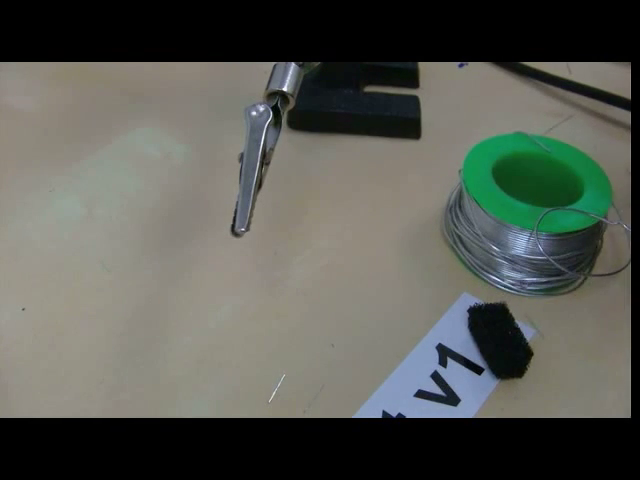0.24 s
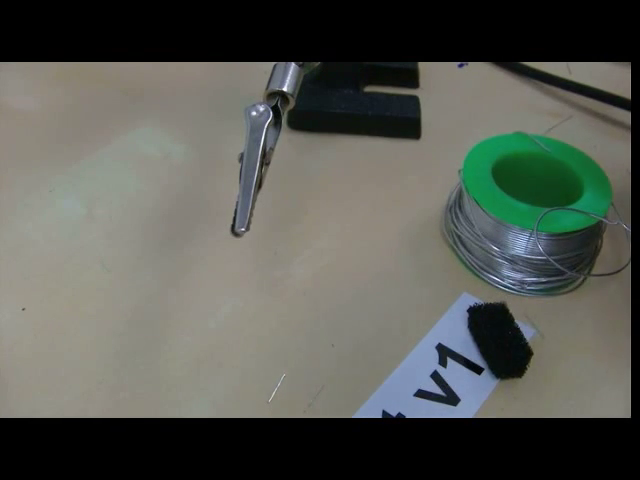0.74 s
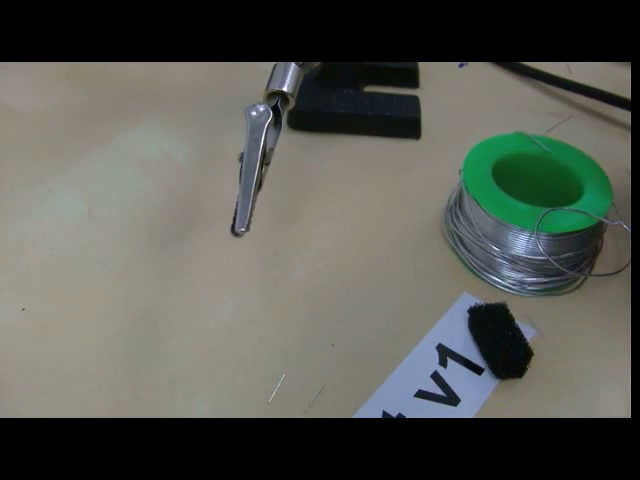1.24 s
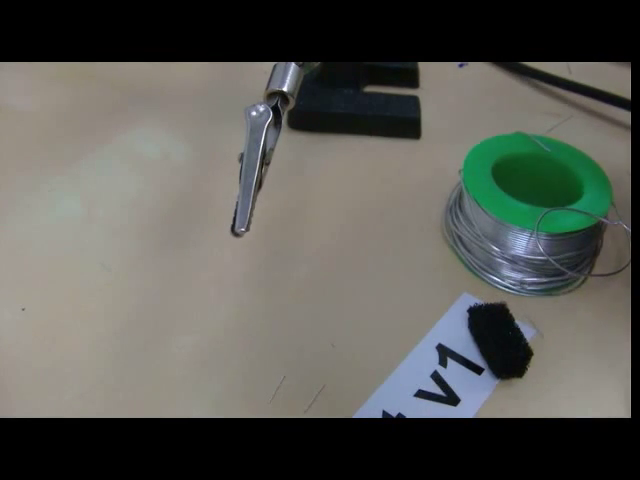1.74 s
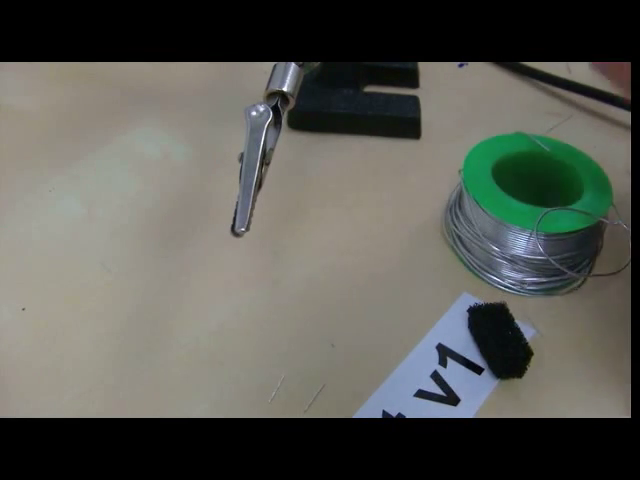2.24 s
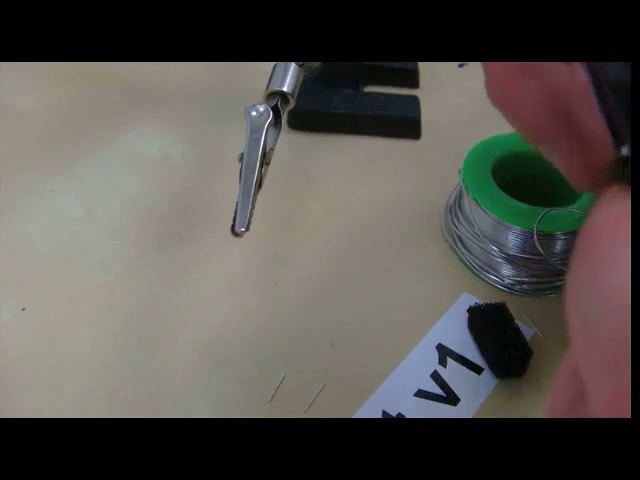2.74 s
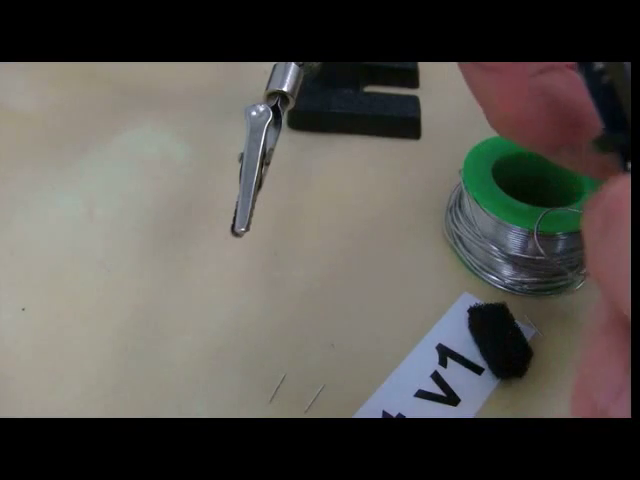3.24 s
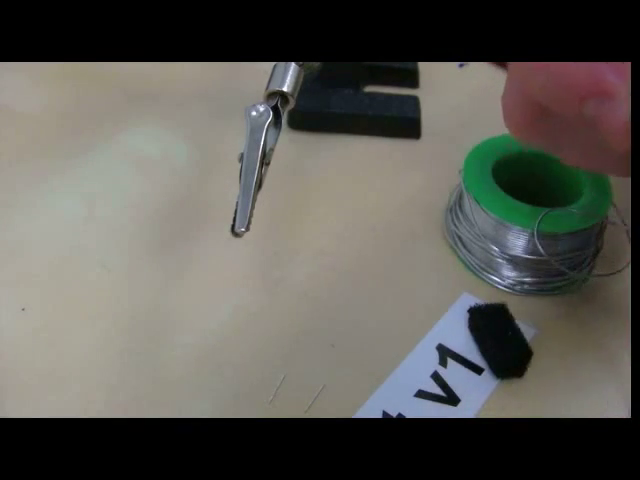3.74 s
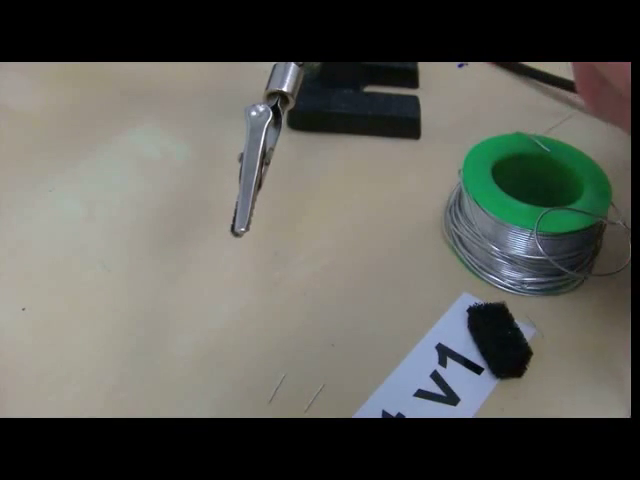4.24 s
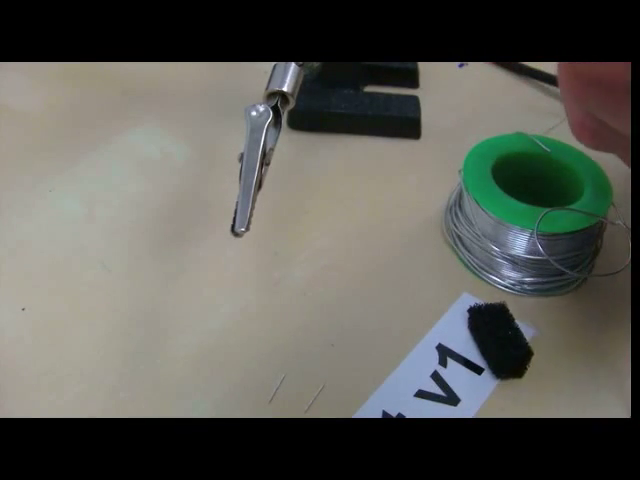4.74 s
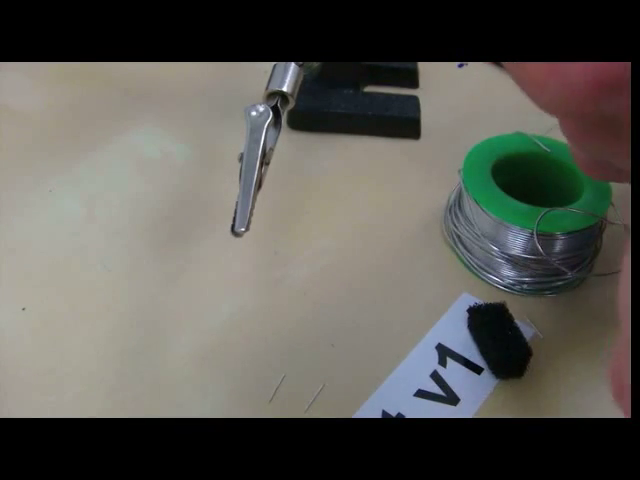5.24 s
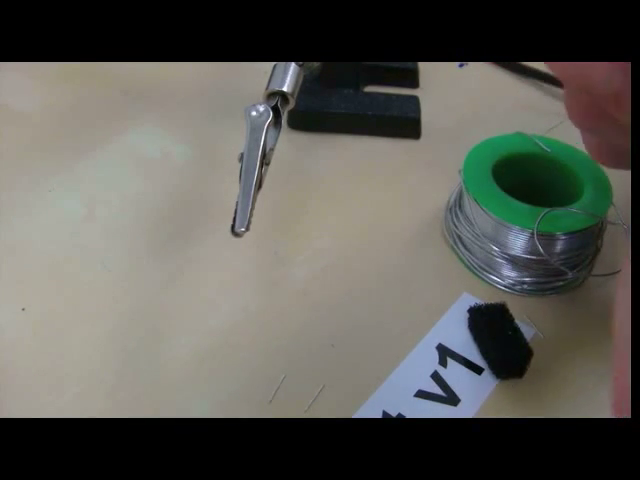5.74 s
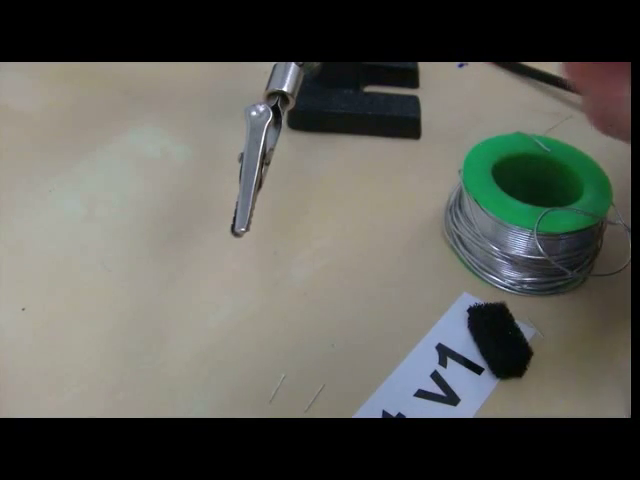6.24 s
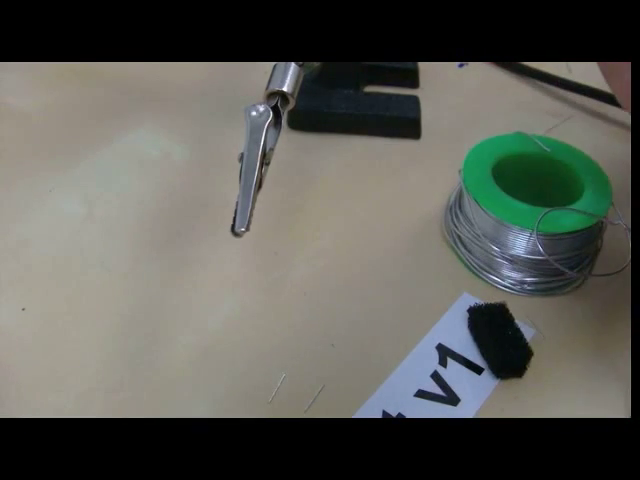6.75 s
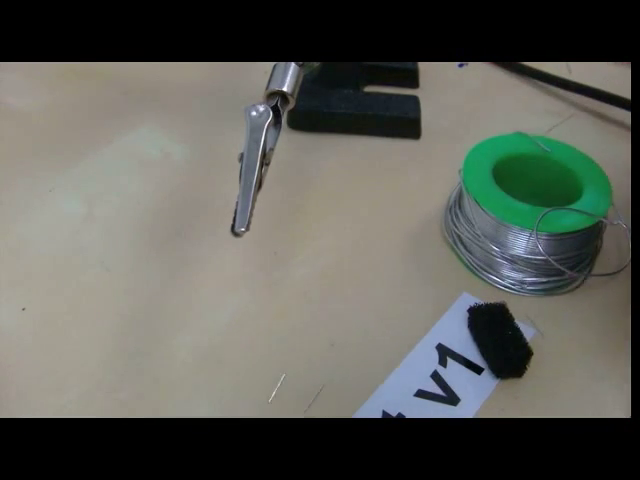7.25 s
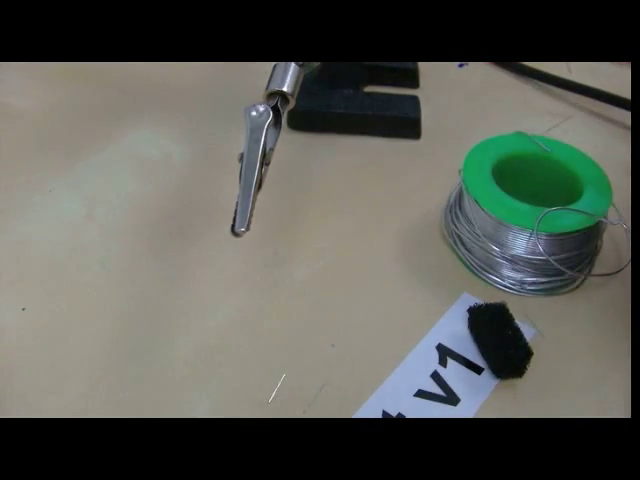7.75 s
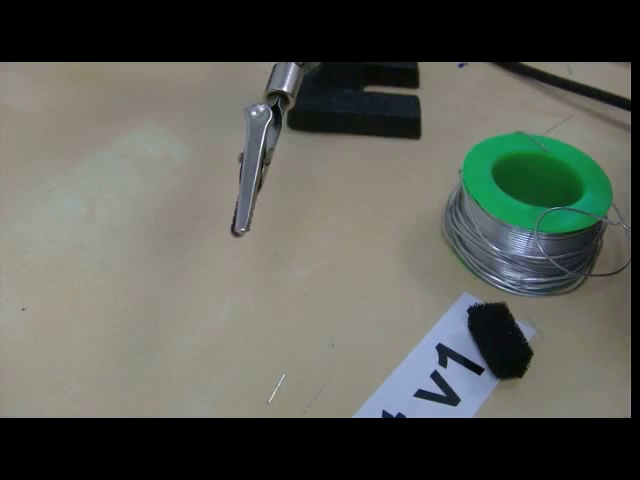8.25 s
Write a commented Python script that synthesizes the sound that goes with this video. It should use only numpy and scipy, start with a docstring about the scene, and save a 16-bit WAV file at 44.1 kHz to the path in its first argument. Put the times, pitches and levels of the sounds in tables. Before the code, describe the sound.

After a few quiet seconds of fan air, crisp plastic zip clicks come in short bursts, ending with one hard snap that rings briefly.

```python
"""First a fan rushes in a small room, with faint, soft swells of noise and light finger ticks: filtered noise.
Close by, over a workbench, a nylon cable tie is then drawn through its ratchet head in short spurts.
Each tooth snaps the pawl, a brief noise burst coloured by the tie's resonances; every new grip rings differently.
Bench scatter, a wall echo and a short room tail answer each snap; the last tooth leaves the strap ringing.
A faint low room resonance, faint wavering fan tones and a steady mains hum are sines."""
import sys
import numpy as np
from scipy import signal
from scipy.fft import rfft, irfft
from scipy.io import wavfile

SR = 44100
rng = np.random.default_rng(int(sys.argv[2]) if len(sys.argv) > 2 else 0)


def dump(signal):
    """Clip the signal to [-1, 1] and save it as 16-bit WAV at the path in sys.argv[1]."""
    limited = np.clip(np.atleast_2d(signal).T, -1, 1)
    pcm = np.round(limited * 32767).astype(np.int16)
    wavfile.write(sys.argv[1], SR, pcm)


N = 373968

# Teeth passing the pawl. Each row: start in seconds, relative level in dB, brightness in dB per octave,
# low knock in dB, ping in dB, ping in Hz, antiresonance in Hz, delay until the pawl lands in seconds,
# strength of the landing as a signed share of the release.
TEETH = [(2.8137, -11.0, 3.5, 10.5, 7, 11780, 7900, 0.000233, 0.29),
         (2.932, -17.5, -0.5, -4.5, 9, 10930, 7760, 0.00035, 0.46),
         (2.983, -17.5, -3, 1.5, 5, 4670, 10070, 0.000652, -0.33),
         (3.0274, -10.5, 1.5, 2, 3, 6500, 9200, 0.000538, -0.12),
         (3.066, -14, -2.0, -6, 10, 7210, 7370, 0.000291, 0.23),
         (3.2163, -4.0, -0.5, -2.0, 10, 6850, 8010, 0.000229, 0.33),
         (3.2199, -4, 1, 3, 12.5, 3530, 11900, 0.00045, 0.33),
         (3.2464, -2.5, 1, 11, 6.5, 5160, 12930, 0.00045, 0.23),
         (3.3458, -1.5, 0.5, 8, 2, 5970, 9560, 0.000868, 0.34),
         (3.369, -1.5, 0, 5, 2.5, 6030, 7930, 0.00032, -0.34),
         (3.387, -2.0, -0.5, 1, 10.0, 11830, 8400, 0.000514, -0.29),
         (3.4045, -1.5, 0.0, -1.5, 3.5, 10350, 8170, 0.000251, 0.27),
         (3.407, 2, -4.5, -9, 4.5, 3330, 7750, 0.00055, -0.24),
         (3.4289, -2.5, 1, 4.5, 10.5, 6680, 7910, 0.000355, -0.23),
         (3.4498, -3.5, -1, 5, 5.5, 10250, 2480, 0.00071, 0.22),
         (3.499, 1, -1, 3, 5.0, 4590, 7400, 0.00089, -0.22),
         (3.5187, 1.5, -2, -3, -8.5, 7490, 7540, 0.00093, 0.057),
         (3.5374, -1.5, -2, -0.5, 2.5, 6850, 7990, 0.00048, -0.16),
         (3.5646, -1.0, -3.5, -4, 6.0, 13560, 7950, 0.00028, 0.19),
         (4.6404, -7.0, -2, 1.0, 10.0, 13700, 14440, 0.0006, 0.24),
         (4.685, -4.5, -3.0, -5.5, 5.5, 13880, 7690, 0.000845, 0.18),
         (4.7132, -4.0, -1, -3.5, 1, 5620, 7820, 0.000846, 0.18),
         (4.751, -4.5, 2.5, 1.0, 8, 3300, 8300, 0.000667, -0.18),
         (4.7778, -2.5, 1, 0, -1.0, 13250, 8430, 0.000622, 0.13),
         (4.8178, -2.5, -2, -3.0, 5.0, 12330, 8100, 0.000616, 0.27),
         (4.8584, -2.5, 0.5, 1, 6.5, 2870, 7780, 0.00064, 0.39),
         (5.3692, -5, 0.5, 0, 3.5, 14280, 8180, 0.000744, -0.16),
         (5.384, -4.5, 1, 3, 5, 10110, 8440, 0.00077, -0.17),
         (5.4056, -1.5, 1.0, 5, 7.5, 4590, 14310, 0.00088, 0.24),
         (5.5066, 5.5, -1.5, -9.5, -10, 7200, 8160, 0.00072, -0.05),
         (5.5925, 4, -2.5, -5.0, 7.5, 13800, 7860, 0.00081, -0.1),
         (5.7854, -1.0, 1.5, 1, -2.0, 8890, 8640, 0.00041, -0.2),
         (6.4715, -4, -2, -7.5, 6, 6900, 7660, 0.000584, -0.29),
         (6.5183, -4.5, -0.5, 0.5, 5.0, 7160, 7680, 0.000811, -0.15),
         (6.6504, -5, 1.5, 5.5, 7, 7360, 7570, 0.00063, -0.21),
         (7.756, -7.5, 0.0, 5, 5, 11090, 7980, 0.000678, -0.39),
         (7.9043, -6.5, 0.0, 5, 5.0, 11540, 8070, 0.000781, 0.16),
         (7.9162, 8, -1, -3, 9, 7850, 8010, 0.00027, -0.29)]
# Ring of head and strap, one table per grip. Each row: centre in Hz, half width in Hz, level in dB.
THREADING = [(2070, 470, -5.5), (5500, 2100, -4.5), (6840, 430, -3.5), (7930, 250, -1), (9070, 420, -2.0),
             (11180, 1620, -22), (12160, 250, -16.5), (14300, 740, -18)]
FIRST_PULL = [(1890, 600, -15.5), (5130, 770, -5), (5900, 190, 2), (8140, 250, -8), (8680, 1310, -2),
              (10500, 700, -7), (12040, 260, -11.0), (14800, 1600, -6.5)]
SECOND_PULL = [(2530, 2010, -23.5), (4500, 340, -7.5), (6260, 490, -2.5), (7770, 580, 1.5), (8890, 250, -6),
               (10260, 860, -2), (12490, 300, -6.5), (14820, 1490, -11)]
SLOW_PULL = [(1840, 1500, -17.5), (4770, 1240, -12), (5690, 270, -6), (7230, 1000, -6.5), (8200, 950, -8),
             (10000, 770, -1), (12220, 670, -13.5), (13870, 1250, -11.5)]
FIRM_PULL = [(1000, 660, -9.5), (3860, 860, -11.5), (6240, 390, 0.0), (7520, 880, -0.5), (8960, 360, -8.5),
             (10360, 980, -5), (12480, 1030, -3.5), (14840, 310, -3.5)]
HARD_PULL = [(2560, 1900, -17.5), (4600, 290, -8.5), (6600, 520, -4), (7500, 400, -1), (7900, 280, 4),
             (10310, 300, -19), (12330, 830, -3), (14800, 300, -8)]
LAST_PULL = [(1620, 1040, -11.5), (3150, 220, -10), (6020, 280, 0), (6780, 410, 0.5), (7870, 330, 5),
             (10100, 310, -3), (12500, 720, -3.5), (14280, 1070, -6.5)]
TIGHTENING = [(1170, 740, -13.5), (3170, 1090, -14.5), (6320, 590, -4.5), (7730, 380, 7), (9310, 220, -8),
              (10390, 210, -3), (11940, 810, -8.0), (13910, 1570, -8.5)]
TAUT = [(2750, 980, -14.5), (4370, 200, -22), (6000, 540, -6), (8030, 460, 2.5), (9250, 620, -2.5),
        (11100, 320, -3), (11840, 1000, -16.0), (14320, 1020, -5)]
# How the tie is held. Each row: ring table, length of the slip in seconds, mean pawl chatter in dB, room in dB.
GRIPS = [(THREADING, .001, -10, -15), (FIRST_PULL, .0012, -8, -17.5), (SECOND_PULL, 0.00092, -13, -19),
         (SLOW_PULL, .00085, -12, -18), (FIRM_PULL, 0.0007, -15, -19), (HARD_PULL, 0.000925, -11, -18),
         (LAST_PULL, 0.00096, -13, -21), (TIGHTENING, 0.0009, -9.5, -16), (TAUT, 0.00122, -11, -14)]
# Moments at which the next grip takes over. Each entry: time in seconds.
REGRIP_S = [3.15, 3.475, 4.2, 5.1, 5.45, 5.7, 6.1, 7.83]
# Clusters of modes in the taut strap. Each row: centre in Hz, half width in Hz, relative level in dB,
# t60 in seconds.
STRAP_MODES = [(2500, 170, -6, 0.04), (4100, 390, -8, 0.074), (6340, 420, -14, 0.38),
               (8350, 950, -7.5, 0.26), (9250, 450, -9, .12)]
# The clearer ticks of fingers and strap tip. Each row: start in seconds, relative level in dB, centre in Hz,
# half width in Hz, dull body in dB.
TICKS = [(1.4086, -20.5, 6450, 300, -8.5), (1.605, -34.5, 9500, 3800, -2), (1.685, -34, 5000, 5000, -8),
         (1.7601, -24.5, 6400, 1300, -10), (2.403, -32.5, 6440, 3400, -14), (2.432, -31.5, 5600, 3000, -12),
         (2.878, -37.5, 7860, 3400, 4), (3.743, -30, 5200, 2800, -8), (3.816, -24, 3680, 1100, -1.5),
         (4.301, -40, 8000, 3400, -8), (4.4432, -32, 5600, 2200, -14), (5.878, -38, 7500, 3000, -12)]
# Soft noise swells, one of them a low swell of the room air. Each row: middle in seconds,
# half length in seconds, rms level at the middle in dB, centre in Hz, half width in Hz.
SWELLS = [(0.538, .05, -68, 3000, 1800), (1.65, 0.48, -62.5, 880, 200), (2.118, 0.067, -66, 1900, 1700),
          (2.917, .09, -68.5, 2600, 2000), (3.427, .06, -60, 1900, 700), (5.22, 0.11, -68, 2300, 2200)]
# A faint low resonance of the room. Each row: frequency in Hz, level in dB, t60 in seconds.
LOW_ROOM_MODES = [(709, -45, 0.11), (1060, -52, 0.12)]
# Decay of the small room. Each row: frequency in Hz, t60 in seconds.
ROOM_DECAY = [(500, 0.27), (3000, 0.14), (8000, 0.11), (15000, 0.11)]
# Spectrum of fan and room air. Each row: frequency in Hz, relative density in dB per Hz.
AIR_SPECTRUM = [(20, -30), (60, -17.5), (100, -20.5), (200, -17), (330, -8), (700, -0.5), (1100, -3),
                (1450, -9), (2600, -16), (4000, -20), (6500, -24.5), (10000, -27.5), (15000, -29.5)]
# Room resonances that the fan excites. Each row: centre in Hz, half width in Hz, lift in dB.
AIR_MODES = [(171.6, 15, 11.5), (228.7, 6.8, 7), (278.5, 7.9, 9), (360.5, 22.7, 8), (473, 8.3, 7),
             (577.8, 8.7, 8.5), (709.5, 22, 4.5), (813, 15, -1), (857, 12.3, 0), (1000.5, 3.9, 10),
             (1024, 4.7, 6), (3190, 25, 6.5), (3404, 22, 8.5), (5300, 76, 1)]
# Tones of the fan. Each row: frequency in Hz, rms level in dB before it wavers.
FAN_TONES = [(398.4, -74.5), (581.4, -81), (909.8, -74.5), (1141, -72.5)]
# Overall colour, with a narrow notch and a dulled top. Each row: frequency in Hz, gain in dB.
OVERALL_COLOUR = [(7700, 0), (7940, -9), (8080, 0.5), (15200, 3.5), (15450, -13)]

# Time (s) and frequency (Hz) axes of one snap
SIZE = 2048
T, HZ = np.arange(SIZE) / SR, np.fft.rfftfreq(SIZE, 1 / SR)


def amp(db):
    """Decibels to gain."""
    return 10 ** (np.asarray(db) / 20)


def unit(x):
    """Scales to energy 1."""
    return x / np.sqrt(np.sum(x ** 2) + 1e-20)


def read(points, hz):
    """Joins (Hz, value) points on a log-frequency axis."""
    f, value = np.transpose(points)
    return np.interp(np.log(hz + 1), np.log(f + 1), value)


def add(mix, s, sound):
    """Mixes a sound in at s seconds."""
    part = mix[round(s * SR):][:len(sound)]
    part += sound[:len(part)]


def bell(hz, centre, width):
    """Response of one resonance, 1 at its centre and 1/2 at its half width."""
    return 1 / (1 + ((hz - centre) / width) ** 2)


def causal(gain):
    """Spectrum of the quickest causal (minimum-phase) filter with this gain."""
    cepstrum = irfft(np.log(np.maximum(gain, 1e-5)))
    half = len(cepstrum) // 2
    cepstrum[1:half] *= 2
    cepstrum[half + 1:] = 0
    return np.exp(rfft(cepstrum))


def drift(rate_hz):
    """Slow random wander of rms 1."""
    hz = np.fft.rfftfreq(N, 1 / SR)
    return np.sqrt(N) * unit(irfft(rfft(rng.standard_normal(N)) * bell(hz, 0, rate_hz) ** 2, N))


def ratchet(level_db=-0.34, low_hz=600, body_db=-27, node_depth=0.75, node_width_hz=380,
            knock_hz=2200, knock_width_hz=800, ping_width_hz=600, chatter_spread_db=5.5):
    """The pawl leaves one tooth and lands on the next, ringing the tie; the grip sets ring, chatter and room."""
    out = np.zeros(N)
    radiated = HZ ** 2 / (HZ ** 2 + low_hz ** 2)  # a small part sends out little bass
    octaves = np.log2((HZ + 1) / 8000)
    for s, db, bright_db, knock_db, ping_db, ping_hz, node_hz, landing_s, landing in TEETH:
        ring, slip_s, chatter_db, room_db = GRIPS[np.searchsorted(REGRIP_S, s)]
        ring_power = sum((amp(d) * bell(HZ, f, w)) ** 2 for f, w, d in ring)
        power = amp(body_db) ** 2 + ring_power
        notch = 1 - node_depth * bell(HZ, node_hz, node_width_hz)
        knock = knock_db * bell(HZ, knock_hz, knock_width_hz)
        ping = ping_db * bell(HZ, ping_hz, ping_width_hz)
        strike_db = bright_db * octaves + knock + ping
        gain = np.sqrt(power) * notch * radiated * amp(strike_db)
        # release and landing are two copies of one burst, so they comb the spectrum
        landed = landing * np.exp(-2j * np.pi * HZ * landing_s)
        two_contacts = (1 + landed) / np.hypot(1, landing)
        # no two teeth slip alike
        tooth_chatter_db = chatter_db + chatter_spread_db * rng.standard_normal()
        burst = two_contacts * snap(tooth_chatter_db, slip_s)
        add(out, s, amp(db + level_db) * surroundings(burst, gain, room_db))
    return out


def snap(chatter_db, slip_s=0.00082, chatter_s=0.002, evenness=0.94):
    """The pawl slips off a tooth in a broadband burst, then chatters briefly against the strap."""
    slip, chatter = rng.standard_normal((2, SIZE))
    window = np.sin(np.pi * np.minimum(T / slip_s, 1)) ** 2
    for _ in range(3):  # so short a slip pushes all frequencies about equally
        z = rfft(slip * window)
        slip = irfft(z / (abs(z) + 1e-9) ** evenness)
    chatter *= (T > slip_s) * np.exp(-T / chatter_s)
    slip = unit(slip * np.sqrt(window))
    return rfft(unit(slip + amp(chatter_db) * unit(chatter)))


def taut_ring(level_db=-13):
    """The last and hardest tooth leaves clusters of close modes ringing in the tight strap."""
    out, t, hz = np.zeros(N), np.arange(SR // 2) / SR, np.fft.rfftfreq(SR // 2, 1 / SR)
    last_tooth_s = TEETH[-1][0]
    for centre_hz, width_hz, db, t60 in STRAP_MODES:
        random_phase = np.exp(2j * np.pi * rng.random(len(hz)))
        cluster = irfft(random_phase * bell(hz, centre_hz, width_hz))
        add(out, last_tooth_s, amp(level_db + db) * unit(cluster * amp(-60 * t / t60)))
    return out


def handling(level_db=3.5, chatter_db=-3, room_db=-10, body_hz=4000, body_width_hz=5000):
    """Fingers feed and regrip the strap: soft ticks, each a snap through one resonance and a dull body."""
    out = np.zeros(N)
    for s, db, centre_hz, width_hz, body_db in TICKS:
        body = amp(body_db) * bell(HZ, body_hz, body_width_hz)
        gain = np.hypot(bell(HZ, centre_hz, width_hz), body)
        add(out, s, amp(db + level_db) * surroundings(snap(chatter_db), gain, room_db))
    return out


def soft_swells(grain_db=3, grain_hz=60):
    """Faint, soft swells of broad noise of uneven strength, one of them a low swell of the room air."""
    out, t, hz = np.zeros(N), np.arange(N) / SR, np.fft.rfftfreq(N, 1 / SR)
    uneven_noise = rfft(rng.standard_normal(N) * amp(grain_db * drift(grain_hz)))
    for s, half_s, db, centre_hz, width_hz in SWELLS:
        band = np.sqrt(N) * unit(irfft(uneven_noise * bell(hz, centre_hz, width_hz), N))
        out += amp(db) * np.exp(-((t - s) / half_s) ** 2) * band
    return out


def low_resonance(start_s=3.425, rise_s=0.0043):
    """A faint low resonance of the room under the fastest spurt: decaying sines that start gently."""
    out, t = np.zeros(N), np.arange(SR // 4) / SR
    rise = np.minimum(t / rise_s, 1)
    for hz, db, t60 in LOW_ROOM_MODES:
        mode = np.sin(2 * np.pi * (hz * t + rng.random()))
        add(out, start_s, rise * amp(db - 60 * t / t60) * mode)
    return out


def surroundings(burst, gain, room_db, blur_hz=4000):
    """A burst of this colour, heard directly and off the bench and walls."""
    # sound sent in all directions averages out the peaks and dips of the direct path
    blur = unit(bell(HZ - HZ[len(HZ) // 2], 0, blur_hz) ** 2) ** 2
    spread = np.sqrt(signal.convolve(gain ** 2, blur, "same", "direct"))
    sound = signal.fftconvolve(irfft(burst * causal(spread)), reflections(room_db))
    add(sound, 0, irfft(burst * causal(gain)))
    return sound


def reflections(room_db, bench_db=-15, bench_s=0.0021, first_s=0.0016, wall_s=0.0022,
                echo_s=0.00895, echo_spread_s=.0006, echo_db=-25):
    """Quick scatter from things on the bench, one blurred wall echo and the tail of a small room."""
    t = np.arange(SR // 4) / SR
    near, far, wall = rng.standard_normal((3, len(t)))
    # each frequency of the tail dies away at its own rate
    hz, frame_s, z = signal.stft(far, SR, nperseg=128)
    decay = amp(-60 * frame_s / read(ROOM_DECAY, hz)[:, None])
    tail = signal.istft(z * decay, SR, nperseg=128)[1][:len(t)]
    tail = tail * np.minimum(t / wall_s, 1)
    bench = near * (t > first_s) * np.exp(-t / bench_s)
    echo = wall * np.exp(-((t - echo_s) / echo_spread_s) ** 2)
    return amp(bench_db) * unit(bench) + amp(echo_db) * unit(echo) + amp(room_db) * unit(tail)


def fan(air_db=-57, waver=0.37, wander_rad=0.67, hiss_hz=4000, gust_hz=900, gust_width_hz=450, gust_depth=0.12,
        ease_db_per_s=0.16, unrest_db=0.1, unrest_hz=3.3):
    """Rushing air coloured by the room eases slowly under a steadier hiss, with faint wavering tones."""
    t, hz = np.arange(N) / SR, np.fft.rfftfreq(N, 1 / SR)
    colour_db = read(AIR_SPECTRUM, hz) + sum(db * bell(hz, f, w) for f, w, db in AIR_MODES)
    noise = rfft(rng.standard_normal(N))
    air = amp(air_db) * np.sqrt(N) * unit(irfft(noise * amp(colour_db), N))
    # the swell moves the lows most and leaves the hiss steadier
    rush = irfft(rfft(air) * bell(hz, 0, hiss_hz), N)
    swell = amp(ease_db_per_s * (t.mean() - t) + unrest_db * drift(unrest_hz))
    # the middle of the rush flutters
    middle = irfft(rfft(air) * bell(hz, gust_hz, gust_width_hz), N)
    eddies = gust_depth * drift(13.6) * middle
    tones = np.zeros(N)
    for f, db in FAN_TONES:
        strength = amp(db) * np.sqrt(2) * (1 + waver * drift(4.3))
        tones += strength * np.sin(2 * np.pi * f * t + wander_rad * drift(1.5))
    return air + (swell - 1) * rush + eddies + tones


def mains(level_db=-80.5):
    """Steady electrical hum, one sine at twice the line frequency."""
    return amp(level_db) * np.sqrt(2) * np.sin(2 * np.pi * 120 * np.arange(N) / SR)


def scene():
    """The tie and the fingers close by, the soft swells, fan and mains hum behind them."""
    close = ratchet() + taut_ring() + handling()
    background = soft_swells() + low_resonance() + fan() + mains()
    return (close + background)[None]


def record(dry, edge_hz=16500):
    """Overall colour, then the band limit."""
    hz = np.fft.rfftfreq(N, 1 / SR)
    coloured = irfft(rfft(dry) * causal(amp(read(OVERALL_COLOUR, hz))), N)
    lowpass = signal.firwin(255, edge_hz, window=("kaiser", 9), fs=SR)
    return signal.oaconvolve(coloured, lowpass[None], "same")


dry = scene()
out = record(dry)
dump(out)
```